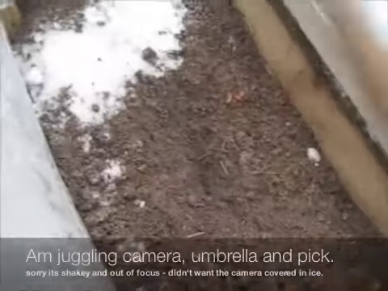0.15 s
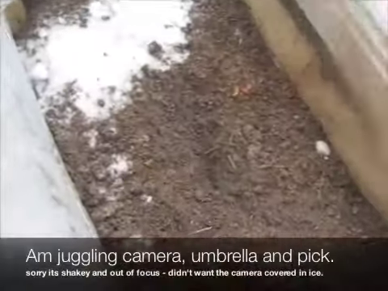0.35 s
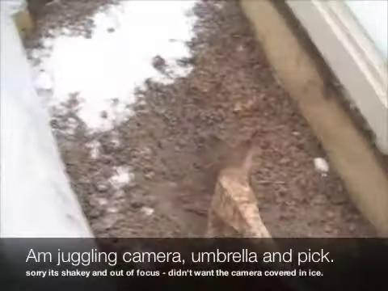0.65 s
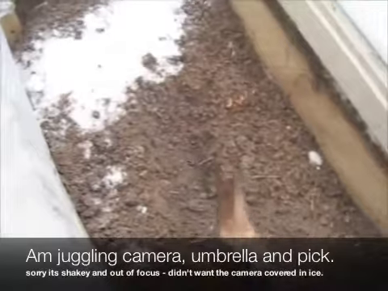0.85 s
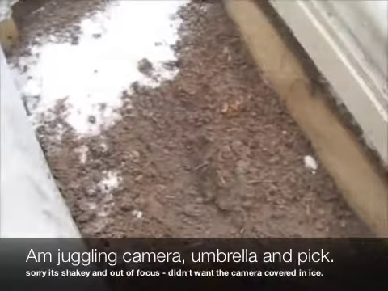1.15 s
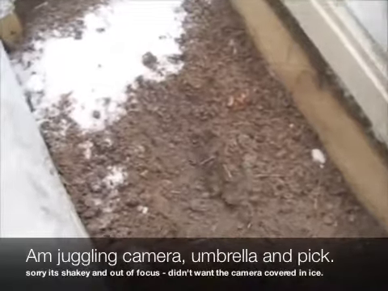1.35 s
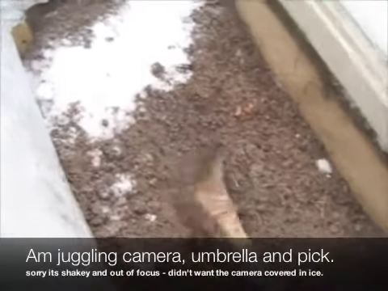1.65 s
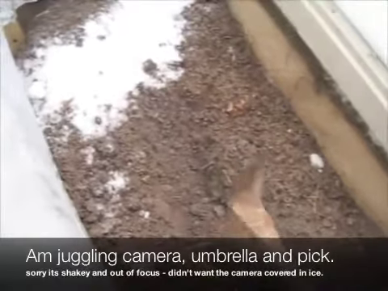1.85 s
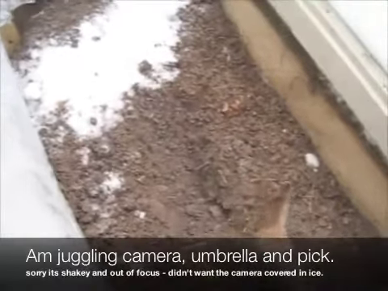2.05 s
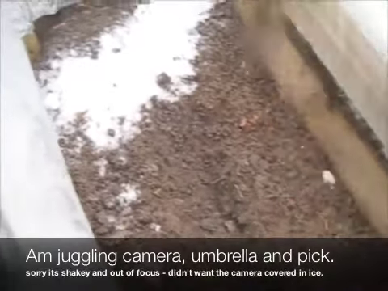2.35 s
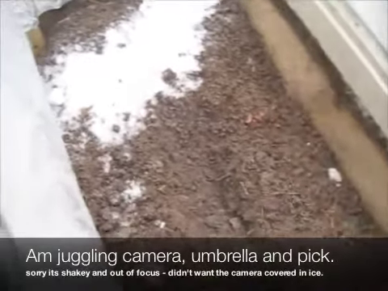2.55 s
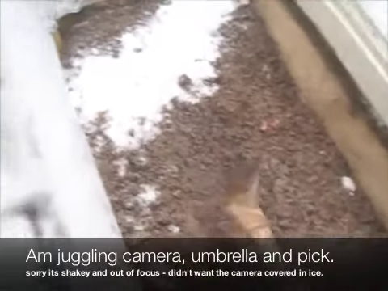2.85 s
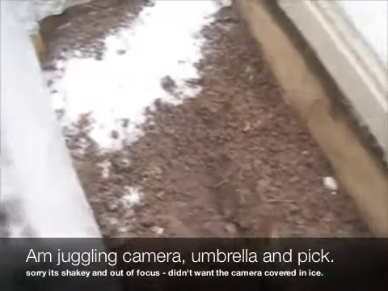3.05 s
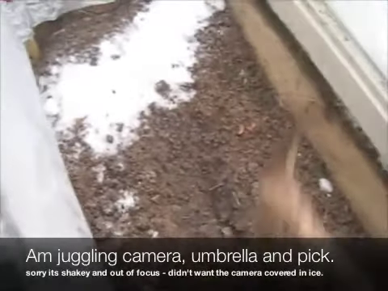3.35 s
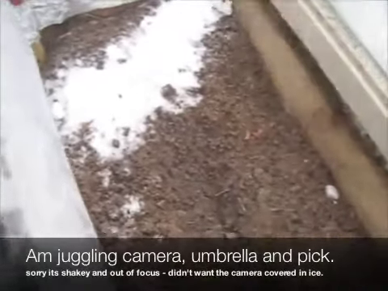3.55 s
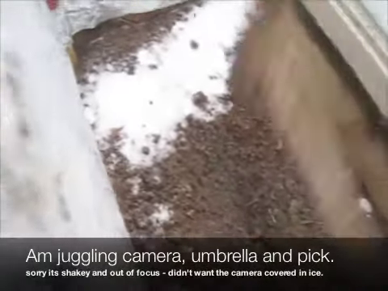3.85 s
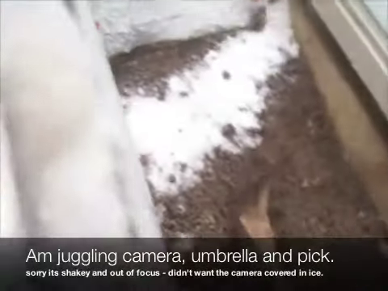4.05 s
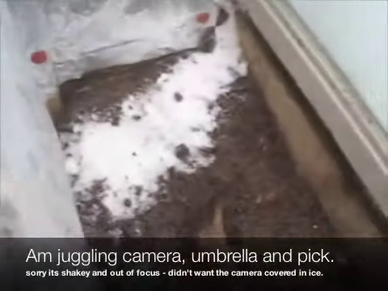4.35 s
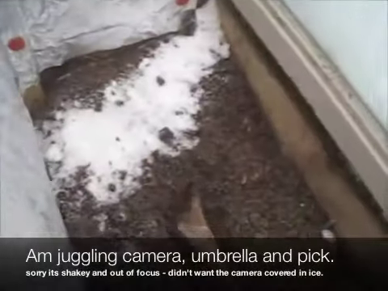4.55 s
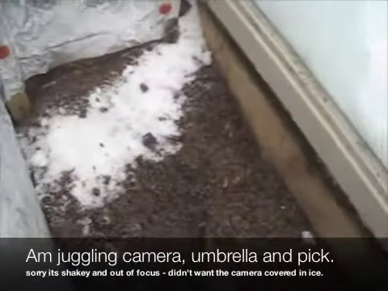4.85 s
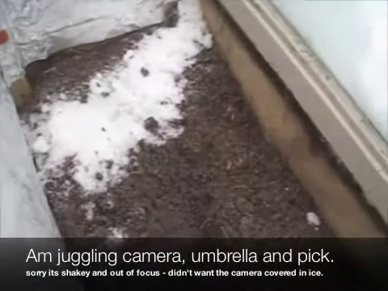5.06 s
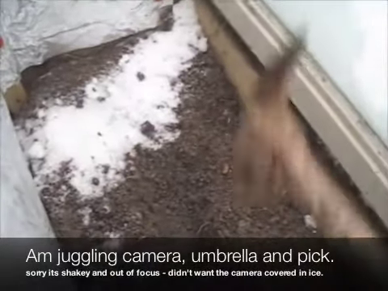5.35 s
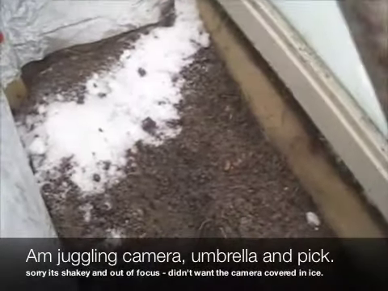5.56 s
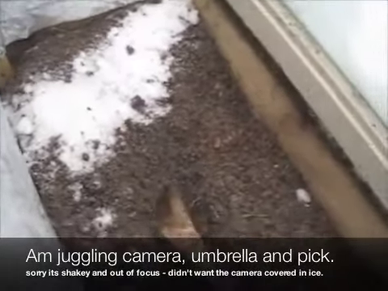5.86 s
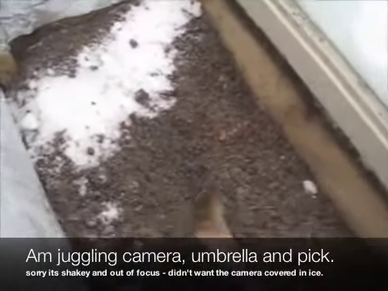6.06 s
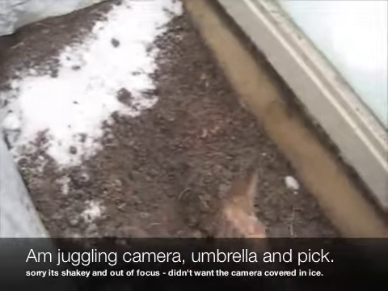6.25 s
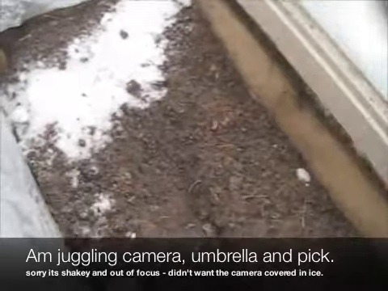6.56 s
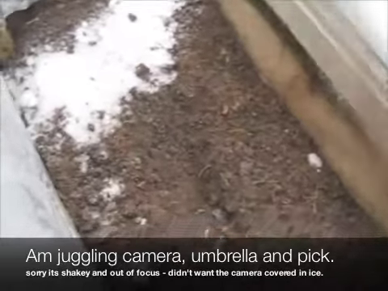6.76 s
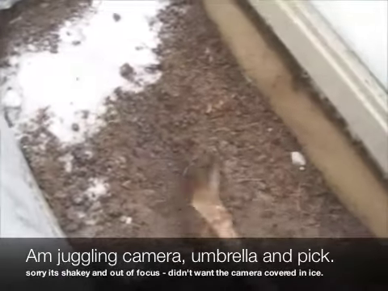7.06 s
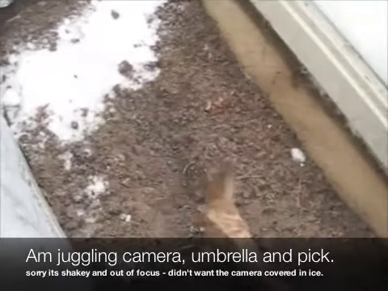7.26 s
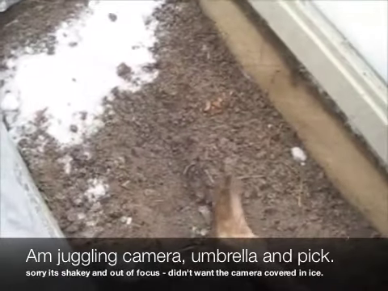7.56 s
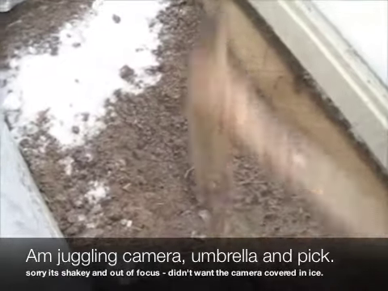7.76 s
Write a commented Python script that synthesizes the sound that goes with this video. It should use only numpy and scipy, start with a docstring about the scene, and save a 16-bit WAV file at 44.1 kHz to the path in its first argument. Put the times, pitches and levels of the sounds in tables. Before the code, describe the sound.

Six hard, dry pick blows crunch into icy ground under a steady crackle of ice pellets on an umbrella, with scrapes and trickling grit.

```python
"""Under an umbrella on frozen ground: sleet patters on the taut cloth just above the microphone while
a steel pick head strikes, bounces and scrapes on the soil. Crumbs of earth scatter and loose grit trickles.
Sleet is short dents in the cloth plus drumming and hiss; blows are coloured noise bursts plus steel and
wooden handle tones; scrapes are runs of small catches; soil is bright noise bursts; wind is a low noise.
The steady background of patter, grit and wind dips together after most blows."""
import sys
import numpy as np
from scipy import signal
from scipy.fft import rfft, irfft, next_fast_len
from scipy.io import wavfile
from scipy.ndimage import map_coordinates

SR = 44100
rng = np.random.default_rng(int(sys.argv[2]) if len(sys.argv) > 2 else 0)


def waveform_to_disk(signal):
    """Save audio, clipped to [-1, 1], as 16-bit WAV at the path in sys.argv[1]."""
    frames = np.transpose(np.atleast_2d(signal))
    scaled = np.clip(frames, -1, 1) * 32767
    samples = np.round(scaled).astype(np.int16)
    wavfile.write(sys.argv[1], SR, samples)


def ratio(d):
    """dB to gain"""
    e = np.asarray(d, float) / 20
    return 10 ** e


N = 348831  # length in samples

# Tone colours, columns: pitch_hz [Hz], level_db [dB per Hz]
# rattling umbrella cloth
CLOTH_COLOUR = [(88, -35), (150, -26.5), (254, 5.5), (348, -10), (514, 4.5), (730, 0), (1290, 1),
                (2300, -7.5), (4000, -32.5)]
# spray of ice
SPRAY_COLOUR = [(1000, -20), (1800, 2.5), (3300, 2), (5100, -2), (14000, -22.5), (16000, -41)]
# crushed frozen crust
CRUNCH_COLOUR = [(180, -24.5), (300, -10.5), (1200, 1.5), (2400, 0.5), (3600, 3), (5000, -4), (7000, -33)]
# treble of the breaking crust
CRACK_COLOUR = [(3000, -27.5), (4500, -16), (6000, 2.5), (10000, -8), (16000, -24.5)]
# quick knock of the frozen ground
KNOCK_COLOUR = [(150, -22), (250, -5), (530, 5), (1200, -3.5), (2500, -23.5)]
# slower boom of the frozen ground
BOOM_COLOUR = [(50, -36), (100, 0), (185, 3), (300, -0.5), (600, -69)]
# Tones of the steel pick head, columns: pitch_hz [Hz], level_db [dB],
# free_t60_s [s to fall 60 dB when nothing grips it], light_gain_db [dB gained per 10 dB lighter contact]
STEEL_TONES = [(1240, -9, .03, -1), (1445, -22, .17, 3), (1675, -9, .035, -1), (2280, -10, .035, -1),
               (2830, -3, .05, .5), (3540, -4, .055, -1), (4270, -37, .13, 7.5), (5340, -14, .04, -1),
               (5920, -7, .035, -2), (6010, -25, .12, .5), (6700, -11, .03, -1), (7700, -14, .04, 0),
               (9870, -17, .04, 1)]

USUAL_BACKGROUND_DB = -48.5  # grit and wind are set relative to this background level


def unit(x):
    """Scale to an rms (average strength) of 1."""
    return x / np.sqrt(np.mean(x ** 2) + 1e-20)


def coloured(x, spectrum):
    """Filter x through a smooth (Hz, dB) spectrum, scaled so that white noise keeps its power."""
    padded = next_fast_len(N + 8192)
    hz, level_db = np.transpose(spectrum)
    bin_hz = np.fft.rfftfreq(padded, 1 / SR)
    gain = ratio(np.interp(np.log(bin_hz + 1), np.log(hz + 1), level_db))
    return irfft(rfft(x, padded) * unit(gain), padded)[:N]


def placed(times, sounds):
    """Add up short sounds (one row each) that start at the given times."""
    index = np.round(times * SR).astype(int)[:, None] + np.arange(sounds.shape[1])
    return np.bincount(index.ravel(), sounds.ravel(), N + SR)[:N]


def bursts(times, level_db, t60_ms, rise_ms, size=3000):
    """White noise bursts that rise, then fall by 60 dB every t60_ms."""
    def column(values):
        return np.reshape(values, (-1, 1))

    ms = np.arange(size) / SR * 1000
    fade = ratio(column(level_db) - 60 * ms / column(t60_ms))
    shape = fade * (1 - np.exp(-ms / column(rise_ms)))
    return placed(times, shape * rng.standard_normal(shape.shape))


def ringing(tones, times, start_db, light_db, length, spread_db, size=5000):
    """A struck body: light contacts favour other tones than hard ones, and the soil's grip shortens the ring."""
    t = np.arange(size) / SR
    out = np.zeros((len(times), size))
    shares_db = spread_db * rng.standard_normal((len(times), len(tones)))
    for (hz, tone_db, free_t60_s, light_gain_db), share_db in zip(tones, shares_db.T):
        first_db = start_db + tone_db + share_db + light_gain_db * light_db / 10
        fade = ratio(first_db[:, None] - 60 * t / (free_t60_s * length[:, None]))
        out += fade * np.sin(2 * np.pi * hz * t)
    return placed(times, out)


def shower(rate, spread_db, top_db):
    """Random landing times (rate per second) and levels: many small, few large."""
    draw = rng.random((int(rate * N / SR), 2))
    times = draw[:, 0] * N / SR
    level_db = -spread_db * np.log(1 - draw[:, 1])
    return times, np.minimum(level_db, top_db)


def background_level():
    """Level of the steady background in dB, read from a table: it dips after most blows, then climbs back."""
    # The background's level over time, columns: time_s [s], level_db [dB]
    level_curve = [(0, -46), (.15, -52.5), (1.06, -54.5), (1.4, -52), (1.58, -67.5), (1.7, -59.5),
                   (2.1, -59), (2.5, -51), (2.67, -47), (2.76, -57.5), (2.97, -58.5), (3.02, -51),
                   (3.39, -46.5), (3.99, -47.5), (4.2, -47.5), (4.65, -47.5), (4.89, -39.5), (5.2, -45.5),
                   (5.77, -45), (5.86, -64.5), (6.1, -58), (6.42, -55), (6.75, -47), (6.95, -53),
                   (7.1, -49.5), (7.58, -48), (7.91, -41.5)]
    return np.interp(np.arange(N) / SR, *np.transpose(level_curve))


def wind(background_db):
    """Low rumbling noise that dips, less deeply, with the whole background and wanders with random gusts."""
    # Colour of the rumble, columns: pitch_hz [Hz], level_db [dB per Hz]
    rumble_colour = [(15, -2), (25, 0), (37, 2.5), (156, -1.5), (250, -2), (320, -31), (550, -120)]
    t = np.arange(N) / SR
    gusts_db = 2 * map_coordinates(rng.standard_normal(44), [t * 5])  # 5 random points a second
    level_db = -70.5 + 0.4 * (background_db - USUAL_BACKGROUND_DB) + gusts_db
    return ratio(level_db) * coloured(rng.standard_normal(N), rumble_colour)


def taps(times, level_db, tick_s=0.00012, rebound_s=0.00038, spread=0.16, size=120):
    """The cloth snaps away in a sharp dent, then swings back more slowly; the speed varies from tap to tap."""
    scale = np.exp(spread * rng.standard_normal((len(times), 1)))
    t = (np.arange(size) / SR - 4 * tick_s) / scale
    dent = np.exp(-np.abs(t) / tick_s)
    back = np.exp(-((t - rebound_s) / (0.74 * rebound_s)) ** 2)
    back *= dent.sum(1, keepdims=True) / back.sum(1, keepdims=True)  # no net push
    return placed(times, ratio(level_db[:, None]) * (back - dent))


def panels(times, level_db, centre_hz=750, spread=0.484, cycles=9, size=900):
    """A struck panel of cloth drums at its own pitch, falling 60 dB in a few cycles."""
    pitch_hz = centre_hz * np.exp(spread * rng.standard_normal((len(times), 1)))
    turns = pitch_hz * np.arange(size) / SR
    fade = ratio(level_db[:, None] - 60 * turns / cycles)
    return placed(times, fade * np.sin(2 * np.pi * turns))


def pellets(times, tap_db, spray_db, count=3):
    """A tap, weaker repeats from ribs, ground and bounces, a short drum and rattle of the cloth, a spray of ice."""
    draw = rng.random((len(times), count, 2))
    later = times[:, None] + 0.00314 + 0.02 * draw[..., 0]
    weaker_db = tap_db[:, None] - 13.0 - 12 * draw[..., 1]
    repeats = taps(later.ravel(), weaker_db.ravel())
    drum = panels(times + 0.00085, tap_db - 15)
    rattle = coloured(bursts(times, tap_db - 12.5, t60_ms=42.5, rise_ms=2.17, size=1500), CLOTH_COLOUR)
    spray = coloured(bursts(times, spray_db, t60_ms=44.3, rise_ms=2.53, size=1500), SPRAY_COLOUR)
    return taps(times, tap_db) + repeats + drum + rattle + spray


def sleet(background_db):
    """Large ice pellets stand out on the cloth; small ones merge into patter over a far wash of noise."""
    # The pellets that stand out, columns: start_s [s], tap_db [dB]
    large_pellets = [(.0877, -34.5), (.1229, -27.5), (.19, -36), (0.2815, -35.5), (0.3144, -37.5),
                     (0.3358, -28), (.3607, -33), (.405, -26.5), (0.8325, -37), (0.8725, -35),
                     (1.0926, -31), (1.1083, -33), (1.1352, -29), (1.172, -32.5), (1.1885, -33.5),
                     (1.2327, -35), (1.2787, -39), (1.4023, -28.5), (1.4426, -29), (1.9135, -30.5),
                     (1.9315, -30.5), (2.012, -27), (2.045, -40), (2.1349, -34), (2.157, -20.5),
                     (2.169, -21.5), (2.1885, -26), (2.2039, -30), (2.2592, -26), (2.2782, -25),
                     (2.2856, -25), (2.2961, -31), (2.322, -33), (2.3519, -23.5), (2.3829, -24),
                     (2.4285, -31.5), (2.4553, -36), (2.4889, -27), (2.4994, -21.5), (2.5229, -25.5),
                     (2.595, -28), (2.6398, -26), (2.778, -46), (2.83, -37), (2.8674, -34.5), (3.0204, -35),
                     (3.1138, -38), (3.144, -35), (3.173, -34), (3.2253, -30.5), (3.2405, -24.5),
                     (3.329, -34), (3.3901, -28.5), (3.4669, -23), (3.4905, -34), (3.5663, -26),
                     (3.675, -27), (3.7182, -38), (3.7629, -28), (3.781, -30.5), (3.8012, -28),
                     (4.0065, -28.5), (4.0366, -36), (4.179, -24.5), (4.2807, -25.5), (4.336, -23.5),
                     (4.4785, -25), (4.5996, -24), (4.6344, -26), (4.647, -21.5), (4.8372, -41),
                     (5.0117, -17.5), (5.029, -23), (5.112, -25), (5.2337, -26), (5.275, -31),
                     (5.3356, -22.5), (5.358, -29), (5.4206, -29.5), (5.495, -25.5), (5.5644, -31),
                     (5.5972, -27.5), (5.641, -22.5), (5.7065, -24.5), (5.7597, -27), (5.8657, -39),
                     (5.89, -45), (5.9221, -39), (5.9798, -34.5), (6.05, -33), (6.1145, -32.5),
                     (6.1521, -35), (6.207, -38), (6.2422, -37), (6.2641, -32.5), (6.402, -29),
                     (6.4365, -19.5), (6.452, -22), (6.537, -27.5), (6.5549, -31), (6.5813, -30),
                     (6.6214, -27), (6.6616, -22), (6.6867, -24), (6.704, -31), (6.738, -23.5),
                     (6.817, -21.5), (6.8409, -24), (7.376, -25.5), (7.4086, -27), (7.4512, -24.5),
                     (7.4946, -30.5), (7.576, -27.5), (7.654, -25.5), (7.7039, -29), (7.7861, -33.5),
                     (7.822, -25.5), (7.8842, -28)]
    times, tap_db = np.transpose(large_pellets)
    large = pellets(times, tap_db, tap_db - 14 + 3 * rng.standard_normal(len(times)))
    times, tap_db = shower(rate=120, spread_db=4.0, top_db=9.5)
    small = unit(pellets(times, tap_db, tap_db - 14.5 + 5 * rng.standard_normal(len(times))))
    cloth_wash = 0.27 * coloured(rng.standard_normal(N), CLOTH_COLOUR)
    ice_wash = 0.17 * coloured(rng.standard_normal(N), SPRAY_COLOUR)
    return large + ratio(background_db) * (0.83 * small + cloth_wash + ice_wash)


def trickle_level(background_db):
    """Strength of the running grit: it dips with the whole background; slides down the dug face add to it."""
    # Slides of loose grit, columns: start_s [s], hold_s [s before the fade], level_db [dB]
    slides = [(4.11, 0.15, -50.5), (4.915, 0.19, -62), (6.992, 0.12, -38.5)]
    rise_s, fade_db_per_s = 0.0087, 95
    t = np.arange(N) / SR
    trickle = ratio(-60.5 + 0.55 * (background_db - USUAL_BACKGROUND_DB))
    for start_s, hold_s, level_db in slides:
        rise = np.clip((t - start_s) / rise_s, 0, 1)
        fading_s = np.maximum(t - start_s - hold_s, 0)
        trickle = trickle + rise * ratio(level_db - fade_db_per_s * fading_s)
    return trickle


def soil(background_db):
    """Crumbs land as short bright crackles; fine grit runs as dense ticks over a hiss."""
    # Landing crumbs of soil and ice, columns: start_s [s], level_db [dB], t60_ms [ms to fall 60 dB]
    crumb_landings = [(0.107, -42.5, 44), (0.561, -34.5, 67), (0.671, -45.5, 85), (1.003, -47, 32),
                      (1.536, -44, 40), (1.619, -52.5, 120), (1.656, -53, 160), (1.681, -39.5, 146),
                      (1.731, -34, 75), (2.802, -37, 40), (3.16, -32.5, 15), (3.885, -32.5, 70),
                      (4.095, -35, 64), (4.108, -25, 66), (4.14, -29, 125), (4.209, -34, 29),
                      (4.238, -32.5, 39), (4.267, -27.5, 61), (4.293, -28.5, 34), (4.329, -34.5, 67),
                      (4.442, -34, 42), (4.574, -37, 70), (4.958, -30, 29), (5.09, -33, 42),
                      (5.497, -39.5, 31), (5.544, -34.5, 41), (6.015, -43, 40), (6.19, -45, 29),
                      (6.418, -44, 56), (7.256, -30.5, 66), (7.283, -37, 47), (7.546, -40, 32)]
    # Colour of the grit, columns: pitch_hz [Hz], level_db [dB per Hz]
    grit_colour = [(290, -48), (500, -12.5), (1080, -7), (1620, 1), (3060, 4), (10400, -3.5), (14700, -12),
                   (16000, -34)]
    times, level_db, t60_ms = np.transpose(crumb_landings)
    crumbs = bursts(times, level_db, t60_ms, rise_ms=0.83, size=8000)
    times, level_db = shower(rate=400, spread_db=13.5, top_db=16.5)
    ticks = unit(bursts(times, level_db, t60_ms=23.0, rise_ms=0.47, size=500))
    grit = 1.075 * ticks + 0.72 * rng.standard_normal(N)
    return coloured(crumbs + trickle_level(background_db) * grit, grit_colour)


def scrapes(count=9):
    """Each drag is a run of small catches at uneven moments; they crunch and keep the gripped steel singing."""
    # Drags over the crust, columns: start_s [s], end_s [s], first_db [dB], last_db [dB],
    # ring_db [dB, steel ring relative to the catch]
    drags = [(.444, .457, -29, -24, -1), (.81, .857, -63, -53, 2.5), (1.783, 1.834, -50.5, -32.5, 1),
             (2.984, 3.011, -34.5, -48, -4.5), (4.657, 4.713, -59, -48.5, 9), (4.72, 4.758, -19.5, -28, -8),
             (5.044, 5.076, -47, -50, 3), (6.055, 6.116, -58.5, -43.5, -0.5)]
    draw = rng.random((len(drags), count, 2))
    along = ((np.arange(count) + draw[..., 0]) / count).ravel()  # 0 = start of the drag, 1 = end
    start_s, end_s, first_db, last_db, ring_db = np.repeat(drags, count, axis=0).T
    times = start_s + along * (end_s - start_s)
    uneven_db = 13 * (draw[..., 1].ravel() - 0.5)
    level_db = first_db + along * (last_db - first_db) + uneven_db
    grip = np.full(len(times), 0.5)  # half the free ring time
    ring = ringing(STEEL_TONES, times, level_db + ring_db, light_db=26, length=grip, spread_db=3.5, size=3000)
    crunch = coloured(bursts(times, level_db - 8.5, t60_ms=48, rise_ms=1.0, size=1500), CRUNCH_COLOUR)
    crack = coloured(bursts(times, level_db - 21.5, t60_ms=80, rise_ms=0.3, size=1500), CRACK_COLOUR)
    knock = coloured(bursts(times, level_db - 9.5, t60_ms=37.0, rise_ms=1.2, size=1500), KNOCK_COLOUR)
    boom = coloured(bursts(times, level_db - 16, t60_ms=78, rise_ms=4, size=5000), BOOM_COLOUR)
    return crunch + crack + knock + boom + ring


def blows():
    """Every contact crushes frozen crust, rings the steel head and thuds through the ground; treble dies first."""
    # Contacts of the pick: full blows first, then grazes just before them, bounces and setting down.
    # Columns: start_s [s], level_db [dB], then relative to that level: thud_db, treble_db, ring_db [dB]
    contacts = [(0.4559, -2.5, -20.5, -2, -7), (1.4785, -0.5, -32, -3, -17.5), (2.6795, 1, -24, -10, -14.5),
                (3.9484, -1.5, -20, -21.5, -16), (5.79, 3, -36, -7.5, -23.5), (6.8844, 0.5, -68, -6, -14),
                (0.4526, -13, -36, -2, -4), (0.4821, -22, -11, -26, -17), (0.533, -18, -21, -15, -14.5),
                (0.6688, -45, -27, -20.5, -3.5), (0.7012, -31.5, -18, -12, -13), (0.7342, -46, -18, 8, -9),
                (0.7698, -20, -18, -35.5, -11), (1.4752, -20.5, -7.5, 0, -15), (1.516, -28, -17, -32, -15),
                (2.674, -30, -38, 0, -15), (2.722, -35, -13, -9, -15.5), (2.9886, -33, -8, 1.5, -33),
                (3.0026, -43, -25, 7.5, -1.5), (3.93, -30, -1, 6.5, -4), (3.9446, -19, -24, -6, -20),
                (4.7542, -16.5, -22, -13, -15.5), (5.7867, -18.5, -20, -16, -14),
                (4.924, -33.5, -8, -25, -20), (4.8952, -32, -7, -23, -12), (4.9749, -25.5, -33, -1, -11),
                (6.8796, -26.5, -5.5, -2, -15), (6.8978, -14, -46, -24, -12.5)]
    # Tones of the wooden handle, same columns as the steel tones
    handle_tones = [(178.4, -1, 0.17, 0.02), (542, -7.5, .06, 0)]
    # The last, lowest part of the thud, columns: pitch_hz [Hz], level_db [dB per Hz]
    deep_colour = [(25, -12), (50, -12), (90, -8.5), (140, -11), (250, -50)]
    times, level_db, thud_db, treble_db, ring_db = np.transpose(contacts)
    thud_db = level_db + thud_db
    crack_db = level_db + treble_db - 4.0
    length = 0.56 - 0.0187 * level_db  # share of the free ring time: lighter contacts are gripped less
    crunch = coloured(bursts(times, level_db - 10.0, t60_ms=27.1, rise_ms=0.058), CRUNCH_COLOUR)
    crack = coloured(bursts(times, crack_db, t60_ms=18.4, rise_ms=0.36), CRACK_COLOUR)
    knock = coloured(bursts(times, thud_db + 4.5, t60_ms=49.0, rise_ms=4.2), KNOCK_COLOUR)
    boom = coloured(bursts(times, thud_db - 0.5, t60_ms=79, rise_ms=3.8, size=7000), BOOM_COLOUR)
    deep = coloured(bursts(times, thud_db - 14.5, t60_ms=190, rise_ms=19, size=12000), deep_colour)
    handle = ringing(handle_tones, times + 0.004, thud_db - 11, -level_db, length, spread_db=3.5, size=8000)
    steel = ringing(STEEL_TONES, times, level_db + ring_db, -level_db, length, spread_db=4)
    return crunch + crack + knock + boom + deep + handle + steel


def scene():
    """A low rumble of wind, canopy, ground and pick, at one microphone."""
    background_db = background_level()
    mix = wind(background_db) + sleet(background_db) + soil(background_db) + scrapes() + blows()
    return mix[None]  # one channel


def top_cut(x):
    """Nothing passes above the cut-off."""
    return signal.sosfilt(signal.butter(12, 16700, fs=SR, output="sos"), x)


def record(dry):
    """The loudest peaks are rounded off and the deepest bass is cut."""
    soft = dry / (1 + np.abs(dry / 0.85) ** 6) ** (1 / 6)  # peaks level off towards 0.85
    bass_cut = signal.butter(1, 28 / (SR / 2), "high")  # 28 Hz
    finished = signal.lfilter(*bass_cut, soft)
    return top_cut(finished)


dry = scene()
out = record(dry)
waveform_to_disk(out)
```